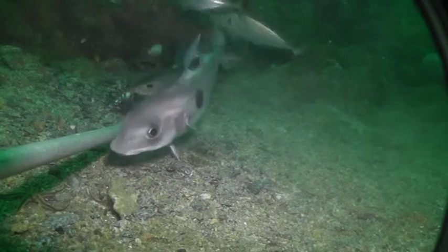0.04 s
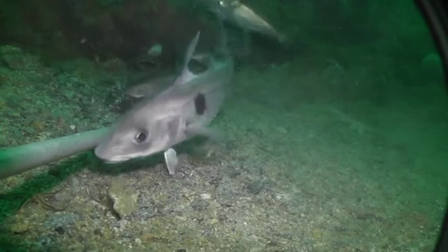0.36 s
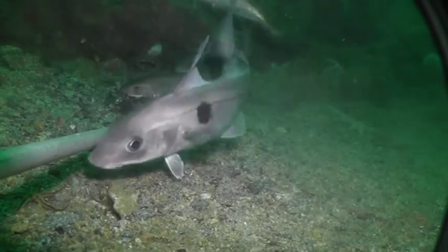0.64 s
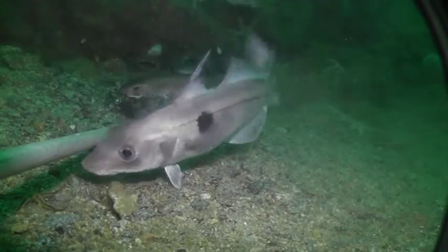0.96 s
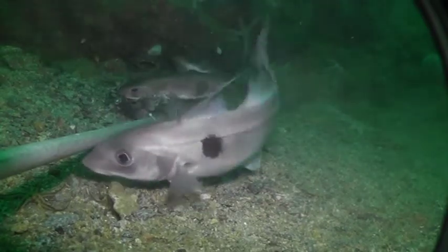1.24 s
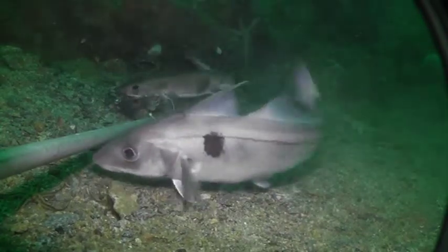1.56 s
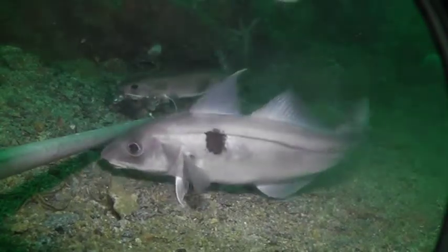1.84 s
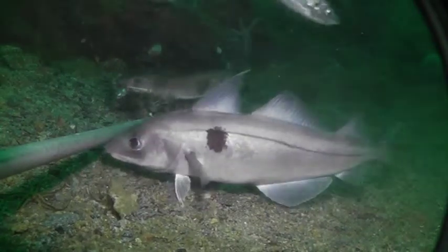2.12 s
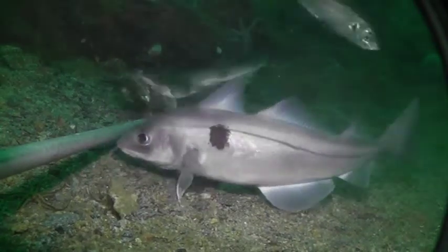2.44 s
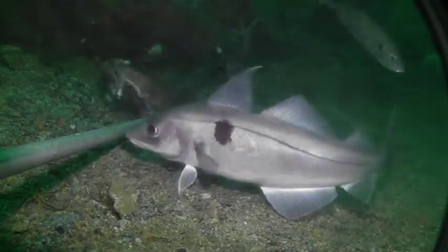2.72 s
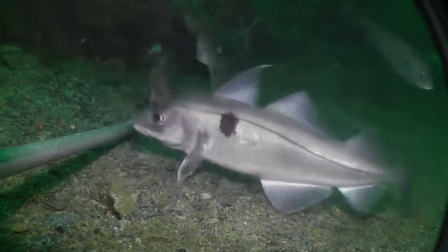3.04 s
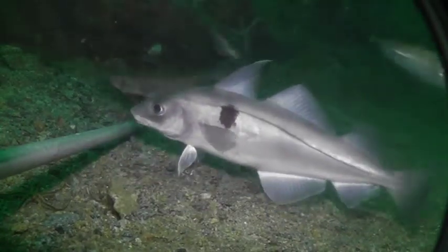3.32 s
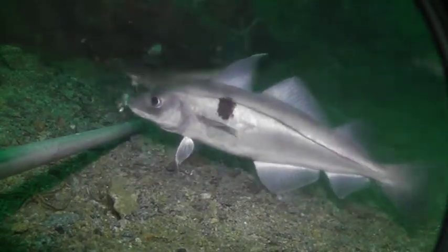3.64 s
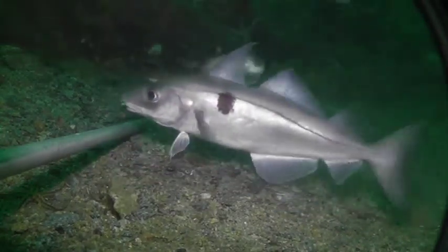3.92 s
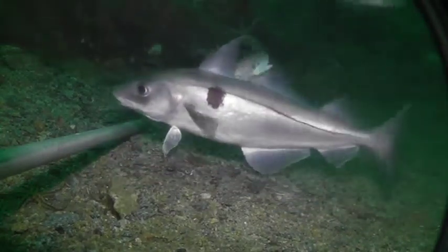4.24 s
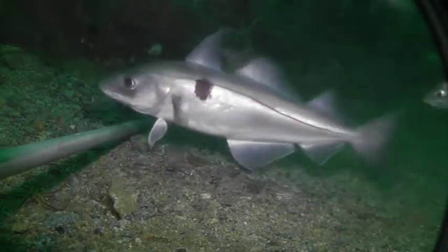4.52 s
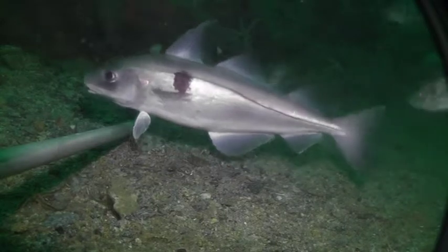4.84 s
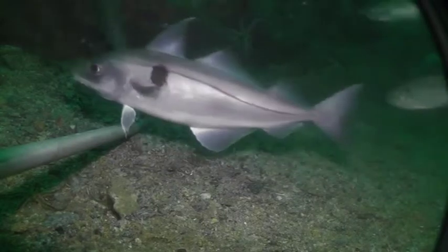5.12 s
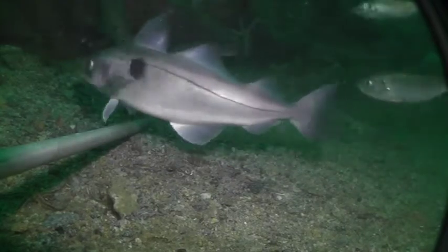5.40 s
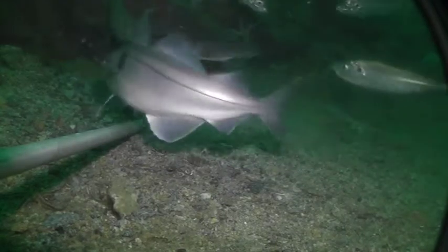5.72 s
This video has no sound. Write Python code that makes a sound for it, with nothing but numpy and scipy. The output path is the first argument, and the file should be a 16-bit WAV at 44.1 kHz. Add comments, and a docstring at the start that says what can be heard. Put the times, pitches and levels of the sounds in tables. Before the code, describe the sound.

The sound is close and carried through the housing of an underwater camera on the seabed. A faint electronic hum and hiss run throughout, with tiny scattered ticks from the water. From the start, a small motor whirrs quietly in uneven bursts, sometimes with a fine, rapid tapping. At about 2.5 seconds a fish hits the rig with one sharp, cracking knock, the loudest event, leaving the bait pole rattling low. Softer bumps follow at once. From about 2.7 to 3.3 seconds the pole chatters and scrapes over grit, strongest near 2.8 seconds, mixed with more dull knocks. Two soft bumps come around 3.4 seconds and another near 4 seconds. After that the motor whirrs in short, even pulses, about three a second, over the hum and faint ticks until the end, near 6 seconds.

```python
"""Fish knock against an underwater camera rig as they feed at its bait pole on the seabed.
One sharp impact and several soft bumps excite the damped modes of the housing; the pole rattles
in its clamp, chatters by stick-slip friction and scrapes over grit. Inside the housing the mains
hums and a small stepping motor whirrs in bursts; faint ticks come from the water."""
import sys
import numpy as np
from scipy import signal
from scipy.fft import rfft, irfft
from scipy.io import wavfile

SR = 44100
rng = np.random.default_rng(int(sys.argv[2]) if len(sys.argv) > 2 else 0)


def int16_out(signal):
    """Quantize to a 16-bit WAV file."""
    q = np.round(np.clip(np.atleast_2d(signal).T, -1, 1) * 32767)
    wavfile.write(sys.argv[1], SR, q.astype(np.int16))


N = 262830
TIME, FREQ = np.arange(N) / SR, np.fft.rfftfreq(N, 1 / SR)

# blows on the rig: t/s, strength/dB, contact cutoff f/Hz, boost of the main mode/dB
KNOCKS = [(2.4565, -8, 14000, 0.5), (2.5125, -32.5, 700, -16), (2.5565, -26.5, 640, -2),
          (2.603, -30.5, 700, 1), (2.7740, -25.5, 785, 0.5), (2.7878, -21.5, 640, 1.5),
          (2.8455, -26, 1070, 2), (2.9245, -33.5, 1090, -7), (3.1119, -42, 1000, -2),
          (3.413, -27.5, 810, 2.5), (3.4570, -32, 770, 5), (3.6140, -56, 2000, -10),
          (3.8620, -43.5, 755, -4), (3.9760, -27, 788, 2.5), (5.8925, -75, 1900, -9)]
HARDEST_KNOCK_S = max(KNOCKS, key=lambda knock: knock[1])[0]
# course of the pole's drag: t/s, pressure level/dB, grit level/dB
DRAG = [(2.69, -48.5, -74.5), (2.76, -40.5, -62.5), (2.835, -32, -40.5), (2.91, -44.5, -49.5),
        (3.0, -40, -53.5), (3.135, -45, -67), (3.208, -42, -52), (3.235, -48.5, -69), (3.4, -49.5, -71),
        (3.48, -42.5, -79)]


def amp(db):
    """Amplitude ratio of a level."""
    return 10 ** (np.asarray(db) / 20)


def unit(x):
    """Normalisation to unit rms."""
    return x / np.sqrt(np.mean(x ** 2) + 1e-20)


def pan(db):
    """Left and right gains for a level difference."""
    return amp([[db / 2], [-db / 2]])


def curve_at(points, hz):
    """Interpolation along a logarithmic frequency axis."""
    f, value = np.transpose(points)
    return np.interp(np.log(hz + 1), np.log(f + 1), value)


def add(mix, s, sound):
    """Superposition of a sound on the mix from time s."""
    part = mix[:, max(round(s * SR), 0):][:, :sound.shape[-1]]
    part += sound[..., :part.shape[1]]


def drag_envelope(column):
    """Amplitude envelope from one level column of the drag, silent outside it."""
    rows = np.array(DRAG)
    return amp(np.interp(TIME, rows[:, 0], rows[:, column], left=-120, right=-120))


def colour(x, spectrum):
    """Spectral shaping, normalised to unit rms."""
    return unit(irfft(rfft(x) * amp(curve_at(spectrum, FREQ)), N))


def noise_pair(correlation):
    """Two channels of partially correlated white noise."""
    a, b = rfft(rng.standard_normal((2, N)))
    correlation = np.clip(correlation, -1, 1)
    return irfft(np.array([a, correlation * a + np.sqrt(1 - correlation ** 2) * b]), N)


def flicker(per_s, depth_db):
    """Random amplitude modulation."""
    knots = rng.standard_normal(N // 8)
    return amp(depth_db * np.interp(TIME * per_s, np.arange(len(knots)), knots))


def shot_envelope(per_s, t60, samples):
    """Poisson process: impulses of random size, each decaying exponentially."""
    impulses = (rng.random(N) < per_s / SR) * np.minimum(rng.exponential(1, N), 3)
    return signal.oaconvolve(impulses, amp(-60 * TIME[:samples] / t60))[:N]


def snap(db, centre_hz, t60, octaves):
    """A transient of band-limited noise with exponential decay."""
    t = TIME[:4096]
    hz = np.fft.rfftfreq(len(t), 1 / SR)
    wall = amp(curve_at([(10500, -1.5), (13000, -8), (16000, -13)], hz))  # the housing dulls the top
    band = wall / (1 + (np.log2((hz + 1) / centre_hz) / octaves) ** 2)
    mid, side = rng.standard_normal((2, len(t)))
    noise = mid + 0.24 * np.array([side, -side])
    return amp(db - 60 * t / t60) * unit(irfft(rfft(noise) * band))


def electronics(mains_hz=50, hiss_db=-59):
    """A harmonic series on the mains frequency, with thin pure tones and steady broadband noise."""
    # mains hum: harmonic number, rms level/dB, left-right difference/dB
    harmonics = [(1, -88, -9), (2, -75, -6), (3, -80.5, -13.5), (4, -82, -7.5), (5, -84, 6),
                 (6, -89.5, -21.5), (7, -80.5, 1), (8, -89.5, 2), (9, -94, 3), (12, -95.5, 31)]
    # whines: f/Hz, rms level/dB
    tones = [(7800, -90), (7827, -91), (14060, -97), (15620, -100)]
    # hiss: f/Hz, relative level/dB
    hiss_spectrum = [(25, -27), (120, 6.5), (400, 5), (720, -4), (900, 6), (1000, -3.5), (1400, -4),
                     (1600, 1), (1690, 7.5), (1790, -1), (1950, -1.5), (2250, -15.5), (3150, -11),
                     (3280, -8), (3420, -12), (7500, -20), (10400, -17), (12500, -23.5), (15800, -21)]
    # stereo image of the hiss: f/Hz, left-right likeness
    hiss_likeness = [(40, -1.03), (130, -0.92), (290, -0.97), (640, -0.71), (1500, 0.8), (7000, 0.84),
                     (10000, 0.68), (12500, 0.17)]
    hum = sum(pan(lr) * amp(db) * np.cos(2 * np.pi * k * mains_hz * TIME) for k, db, lr in harmonics)
    whine = sum(amp(db) * np.sin(2 * np.pi * (hz * TIME + rng.random())) for hz, db in tones)
    hiss = colour(noise_pair(curve_at(hiss_likeness, FREQ)), hiss_spectrum)
    return np.sqrt(2) * (hum + whine) + amp(hiss_db) * hiss


def motor_envelope(spells, spin_up_s=0.021, coast_s=0.034, sag_db_per_s=0.63):
    """Inertia: the motor takes time to spin up and coast down; its level sags slowly in between."""
    gain = np.zeros(N)
    for start, end, db in spells:
        age = np.maximum(TIME - start, 0)
        rise = np.minimum(age / spin_up_s, 1)
        coast = np.exp(-np.maximum(TIME - end, 0) / coast_s)
        gain = np.maximum(gain, amp(db - sag_db_per_s * age) * rise * coast)
    return gain


def motor(steps_per_s=25, hunt_from_s=3.745, hunt_every_s=0.33, hunt_length_s=0.15, idle_db=-74):
    """Structure-borne sound: a stepping motor whirrs through the housing; under load each step taps."""
    # long runs: start t/s, end t/s, level/dB
    runs = [(-.05, .07, -58.5), (.205, .742, -54.5), (.875, 1.03, -56.5), (1.28, 1.53, -58),
            (2.08, 2.23, -57), (2.385, 3.66, -55)]
    # spells under load: first tap t/s, end t/s, level/dB
    loaded_spells = [(0.2078, 0.737, -56.5), (0.767, 1.808, -60.5), (2.4283, 3.893, -55), (4.026, 4.8, -61)]
    # whirr: f/Hz, relative level/dB
    whirr_spectrum = [(200, -26), (330, -19.5), (420, -11), (520, -16.5), (700, -16.5), (800, -15),
                      (900, 4), (985, -12), (1090, -0.5), (1200, -8.5), (1370, -18.5), (1700, -15),
                      (2550, -23.5), (2830, -24.5), (2930, -10), (3060, -21.5), (3190, -18.5),
                      (3300, -14.5), (3450, -32), (3750, -37.5), (4700, -24), (6000, -37.5), (8000, -42.5)]
    # modes struck by a step: f/Hz, relative level/dB, t60/s
    step_modes = [(166.7, -9.5, 0.17), (414, -0.5, .035), (427, 0.5, 0.037), (880, -12.5, 0.019),
                  (1052, -5, 0.023), (1730, -14, .05), (3000, -34.5, 0.0453)]
    # after the long runs it hunts to and fro in even bursts
    hunts = [(s, s + hunt_length_s, -57) for s in np.arange(hunt_from_s, N / SR, hunt_every_s)]
    running, load = motor_envelope(list(runs) + hunts), motor_envelope(loaded_spells)
    effort = np.sqrt(running ** 2 + (amp(-5) * load) ** 2 + amp(idle_db) ** 2)
    throb_depth = 0.072 + 0.39 * np.minimum(load / amp(-56), 1) ** 2
    ratchet = 1 + throb_depth * np.cos(2 * np.pi * 2 * steps_per_s * TIME)
    roughness = flicker(per_s=300, depth_db=2)
    whirr = colour(noise_pair(0.69) * ratchet * roughness, whirr_spectrum) * effort
    taps, t = np.zeros((2, N)), TIME[:SR // 12]
    rings = np.array([amp(db - 60 * t / t60) * np.sin(2 * np.pi * hz * t) for hz, db, t60 in step_modes])
    rings *= np.minimum(t / 0.0018, 1)
    for start, end, _ in loaded_spells:
        scatter_db = 2 * rng.standard_normal((N * steps_per_s // SR, len(rings)))
        for s, mode_db in zip(np.arange(start, end, 1 / steps_per_s), scatter_db):
            add(taps, s, amp(mode_db) @ rings)
    # driven hard, it kicks back halfway between steps and the taps merge into a rasp
    kick = np.minimum(load / amp(-54), 1) ** 2
    taps -= kick * np.roll(taps, SR // (2 * steps_per_s), axis=1)
    return pan(-1.6) * (amp(-1.5) * whirr + amp(-1) * taps * load)


def ticks(t60=0.02, gain_db=-8, stray_db=-56, far_db=-78):
    """Impulsive noise from grit and water: bright single ticks over a faint, distant crackle."""
    # clearest ticks: t/s, relative level/dB, centre f/Hz
    clear_ticks = [(.198, -48.5, 9550), (0.326, -47, 10000), (0.748, -45.5, 8850), (0.815, -44.5, 10500),
                   (.8965, -44, 9200), (0.9675, -47, 10600), (1.112, -51, 8500), (2.0833, -40, 9900),
                   (2.7017, -40.5, 9600), (2.815, -31, 9000), (2.8356, -30, 7100), (2.895, -33, 4570),
                   (3.46, -47, 9900), (3.484, -48.5, 10200), (3.553, -45, 8170), (4.0686, -51, 9450),
                   (4.122, -41.5, 10400), (4.1425, -47.5, 9900), (5.298, -44.5, 10200),
                   (5.4845, -45.5, 10500), (5.8337, -46.5, 10200), (5.892, -36, 7950)]
    # swells of the crackle: centre t/s, half-width/s, boost/dB
    swells = [(0.998, 0.11, 7), (4.14, 0.055, 6), (5.466, 0.15, 5.5)]
    # crackle: f/Hz, relative level/dB
    far_spectrum = [(2000, -20), (5000, -5), (8000, -4), (10000, 0), (12000, -4), (15000, -10)]
    out = np.zeros((2, N))
    for s, db, centre_hz in clear_ticks:
        add(out, s, snap(db + gain_db, centre_hz, t60, octaves=0.42))
    for when, size, pitch in rng.random((45, 3)):
        db = stray_db + gain_db - 3 * np.log(size + 0.1)
        add(out, when * N / SR, snap(db, 7000 + 6500 * pitch, t60, octaves=0.24))
    far = shot_envelope(per_s=90, t60=0.025, samples=4096) * noise_pair(0.81)
    far *= amp(sum(db * np.exp(-((TIME - s) / half_s) ** 2) for s, half_s, db in swells))
    return out + amp(far_db) * colour(far, far_spectrum)


def knocks(rise_s=0.0016, max_cycles=70, echo_s=0.005505, echo_db=-7, echo_hz=1300):
    """Modal ringing: each blow excites the housing, and a soft contact acts as a low-pass filter."""
    # housing modes: f/Hz, relative level/dB, t60/s before water damping, left-right difference/dB
    modes = [(108, -26, 0.0413, -16), (174.8, -25.5, 0.086, -12.5), (365, -5.5, .024, 3),
             (455, -7.5, 0.053, -7.5), (560, -5, 0.041, 3), (700, -12, 0.044, -3), (901, 1.5, 0.058, -2),
             (1035, -13, 0.035, -29), (1196, 0, 0.026, 3), (1547, -12, 0.052, -9), (1800, -8, 0.018, 3.5),
             (2350, -17, 0.053, 1.5), (3020, -24.5, 0.057, -1), (3287, -11, 0.028, -0.5),
             (3430, -25, .02, 8), (3800, -23.5, 0.029, -11), (4510, -9.5, 0.036, 1), (5800, -49, .018, 1.5),
             (7300, -17, 0.033, 4), (7950, -25, 0.018, 8)]
    out, t = np.zeros((2, N)), TIME[:SR // 8]
    main = np.argmax([mode[1] for mode in modes])
    attack = 1 - np.exp(-t / rise_s)
    for s, strength_db, cutoff_hz, boost_db in KNOCKS:
        # a soft body stays in contact and loads the housing, which lowers its pitch
        detune = np.interp(cutoff_hz, [700, 2500], [0.97, 1])
        ring = 0
        for k, (hz, db, t60, lr) in enumerate(modes):
            t60 = min(t60, max_cycles / hz)  # the water damps the high modes
            swing = (-1) ** k * np.sin(2 * np.pi * hz * detune * t) * attack
            ring = ring + pan(lr) * amp(db + boost_db * (k == main) - 60 * t / t60) * swing
        contact = signal.butter(4, cutoff_hz, fs=SR, output="sos")
        add(out, s, amp(strength_db) * signal.sosfilt(contact, ring))
    # the blow runs along the frame and is reflected back duller
    add(out, echo_s, amp(echo_db) * signal.lfilter(*signal.butter(1, echo_hz, fs=SR), out))
    return signal.sosfilt(signal.butter(3, 115, "high", fs=SR, output="sos"), out)


def crack(gain_db=-8):
    """A brief contact has a wide spectrum: the hardest knock starts with a bright crack."""
    # noise bands of the crack: relative level/dB, centre f/Hz, t60/s
    bands = [(-20, 3070, 0.038), (-33.5, 9000, 0.0099)]
    out = np.zeros((2, N))
    for db, centre_hz, t60 in bands:
        add(out, HARDEST_KNOCK_S, snap(db + gain_db, centre_hz, t60, octaves=0.34))
    return out


def pole_rattle(jolts_per_s=60):
    """Bending vibration: the hardest knock leaves the pole rattling low and unevenly in its clamp."""
    # bending modes of the pole: f/Hz, level/dB, t60/s
    modes = [(113, -46.5, 0.63), (268, -40, 0.67), (429, -40, 0.55), (605, -39.5, 0.77), (710, -46, .4)]
    t = np.maximum(TIME - HARDEST_KNOCK_S, 0)
    ring = 0
    for hz, db, t60 in modes:
        # every jolt in the clamp changes the amplitude and phase of the swing
        jolts = rng.standard_normal((1000, 2)) @ [1, 1j]
        swing = np.interp(t * jolts_per_s, np.arange(len(jolts)), jolts)
        ring = ring + amp(db - 60 * t / t60) * (swing * np.exp(2j * np.pi * hz * t)).real
    return pan(-4.5) * ring * np.minimum(t / 0.01, 1)


def pole_scrape(rub_db=-8.5, grit_db=-2, fizz_db=-12, fizz_lead_s=0.049):
    """Sliding friction: the pole rubs dully on the frame and crunches grit; fine sand shifts first."""
    # rubbing on the frame: f/Hz, relative level/dB
    rub_spectrum = [(60, -49), (170, -20.5), (260, -24.5), (420, -11.5), (560, -16.5), (720, -10),
                    (870, -6.5), (1020, -25), (1400, -93), (2500, -44)]
    # crunching grains: f/Hz, relative level/dB
    grit_spectrum = [(300, -23), (1400, 6), (2400, 4), (3100, -2), (3280, 16), (3480, 4), (4600, -1),
                     (4790, 15.5), (5000, 3), (7000, -3.5), (11000, 0), (12500, -5.5), (15800, -15)]
    # fine sand: f/Hz, relative level/dB
    fizz_spectrum = [(5000, -40), (9000, -7), (11500, 1.5), (14000, -3), (15800, -14)]
    pressure, sliding = drag_envelope(column=1), drag_envelope(column=2)
    rub = colour(noise_pair(0.96) * flicker(per_s=120, depth_db=3), rub_spectrum) * pressure
    crunch = 0.57 + shot_envelope(per_s=300, t60=0.015, samples=SR // 20)
    correlation = curve_at([(4000, 0.91), (10000, 1.0), (13000, 0.18)], FREQ)
    grit = colour(noise_pair(correlation) * crunch, grit_spectrum) * sliding
    fizz = colour(noise_pair(0.3), fizz_spectrum) * np.interp(TIME + fizz_lead_s, TIME, sliding)
    return amp(rub_db) * pan(-5.5) * rub + pan(1) * (amp(grit_db) * grit + amp(fizz_db) * fizz)


def pole_chatter(mode_hz=879, waver=0.026, gap_s=0.021, small_length_s=0.026):
    """Stick-slip: each slip briefly pumps the main mode; the small slips follow the pressure."""
    # loudest slips: start t/s, peak level/dB, duration/s
    loud_slips = [(2.724, -34.5, 0.012), (2.773, -16.5, .02), (2.851, -27.5, 0.016), (2.926, -33, .024),
                  (2.951, -34, 0.02), (2.993, -27.5, 0.032), (3.155, -37.5, 0.031), (3.182, -37.5, 0.039)]
    out, pressure = np.zeros((2, N)), drag_envelope(column=1)
    times = np.arange(2.69, 3.48, gap_s)
    jitter, scatter = rng.standard_normal((len(times), 2)).T
    small_slips = []
    for s, offset_db in zip(times + 0.1483 * gap_s * jitter, 1 + 2 * scatter):
        db = 20 * np.log10(pressure[round(s * SR)]) + offset_db
        small_slips.append((s - small_length_s / 2, db, small_length_s))
    for s, db, length in small_slips + list(loud_slips):
        t = np.arange(0, length, 1 / SR)
        drift = np.interp(t, np.linspace(0, length, 5), rng.standard_normal(5))
        phase = 2 * np.pi * np.cumsum(mode_hz * (1 + waver * drift)) / SR
        add(out, s, amp(db) * np.sin(np.pi * t / length) * np.sin(phase))
    return pan(-3) * out


def scene():
    """Superposition of the impacts, the friction and the background of water and machinery."""
    impacts = knocks() + crack() + pole_rattle()
    friction = pole_chatter() + pole_scrape()
    return impacts + friction + ticks() + motor() + electronics()


def record(dry, threshold_db=-22, squeeze=0.42, recover_db_per_s=35, edge_hz=15850):
    """Compression: the gain ducks after a loud blow and recovers; a low-pass filter limits the band."""
    power = signal.lfilter(*signal.butter(1, 40, fs=SR), (dry ** 2).mean(0))
    level_db = 10 * np.log10(abs(power) + 1e-12)
    release_db = TIME * recover_db_per_s
    held_db = np.maximum.accumulate(level_db + release_db) - release_db
    over_db = np.maximum(held_db - threshold_db, 0)
    lowpass = signal.firwin(511, edge_hz, window=("kaiser", 9), fs=SR)
    return signal.oaconvolve(dry * amp(-squeeze * over_db), lowpass[None], "same")


dry = scene()
out = record(dry)
int16_out(out)
```